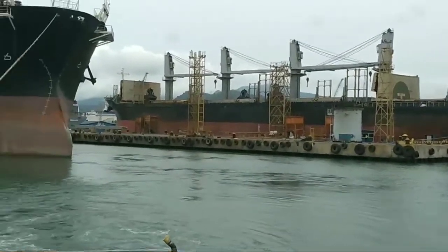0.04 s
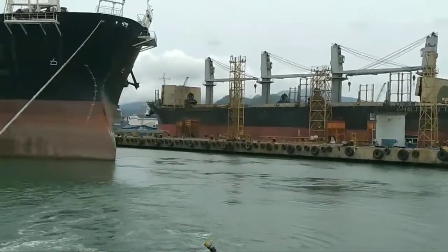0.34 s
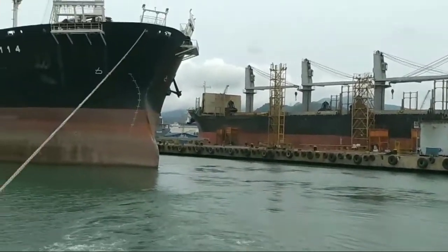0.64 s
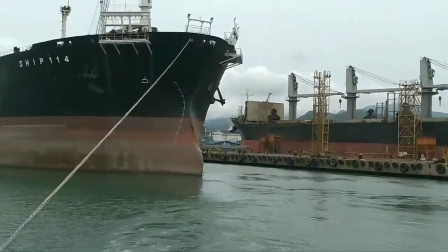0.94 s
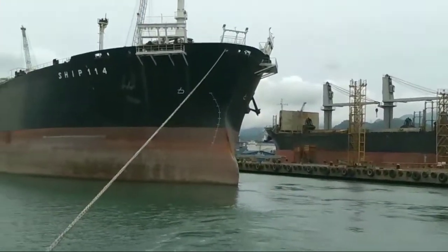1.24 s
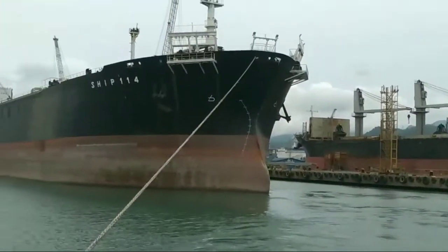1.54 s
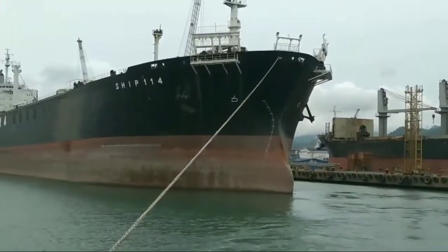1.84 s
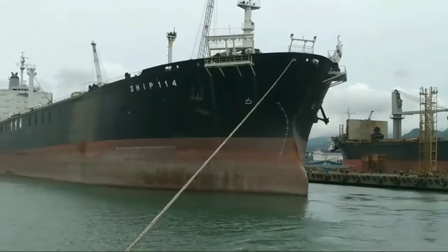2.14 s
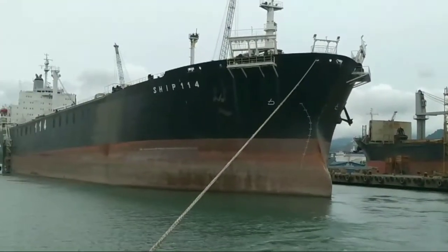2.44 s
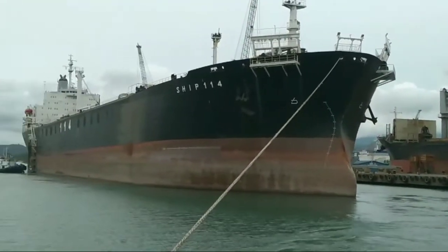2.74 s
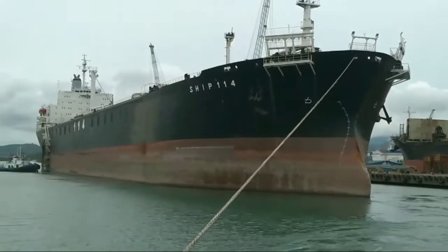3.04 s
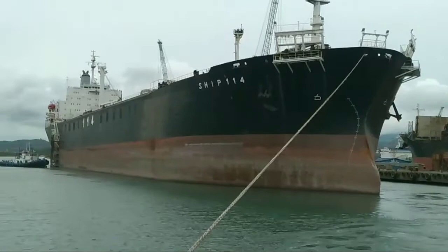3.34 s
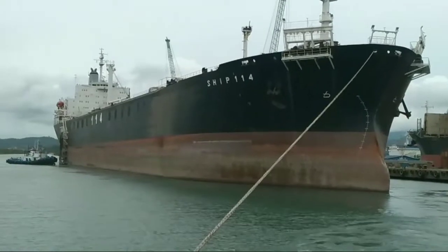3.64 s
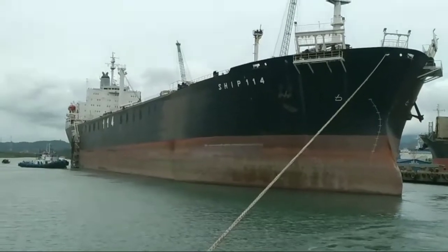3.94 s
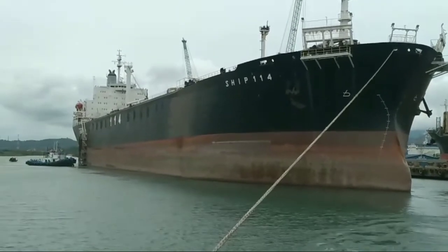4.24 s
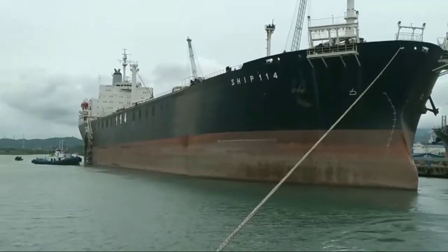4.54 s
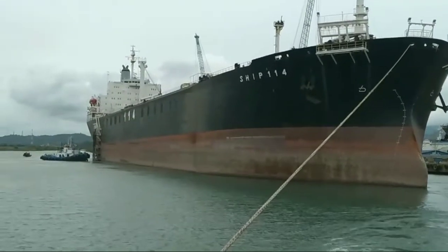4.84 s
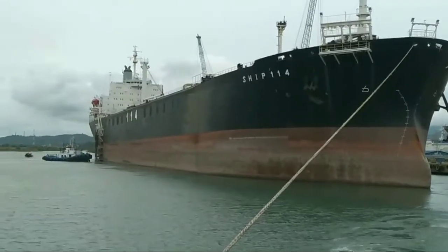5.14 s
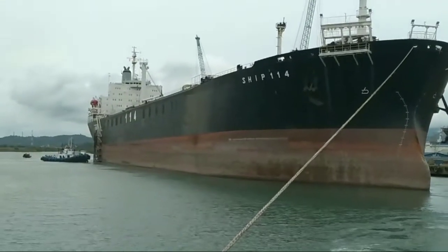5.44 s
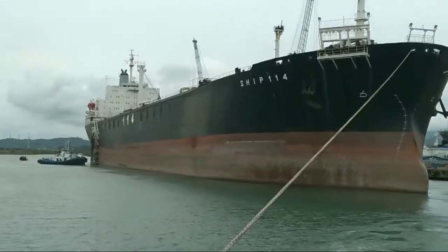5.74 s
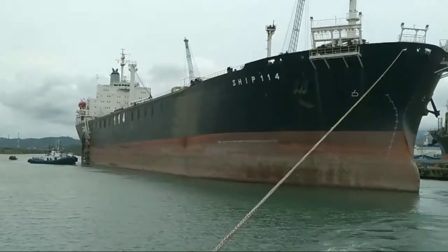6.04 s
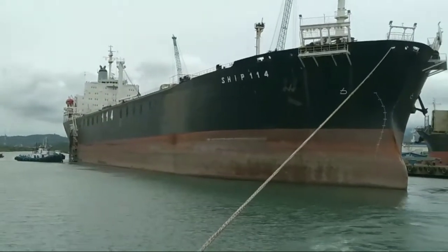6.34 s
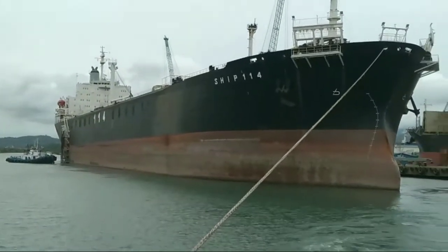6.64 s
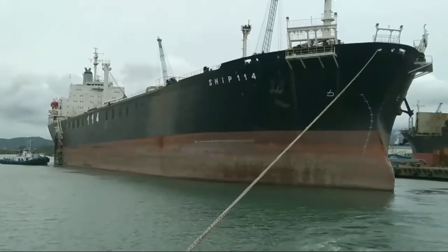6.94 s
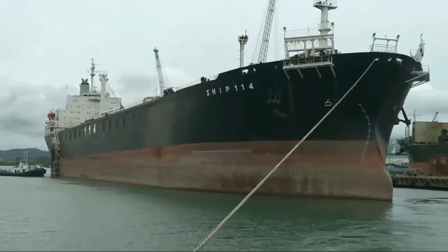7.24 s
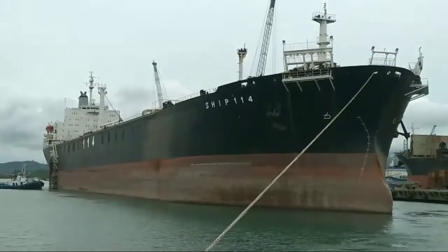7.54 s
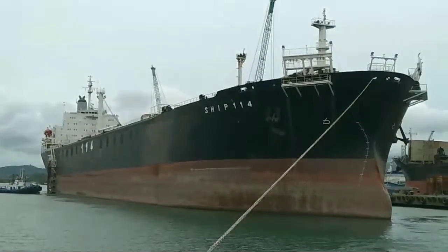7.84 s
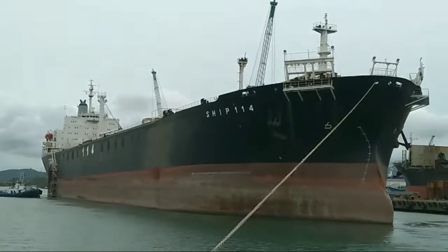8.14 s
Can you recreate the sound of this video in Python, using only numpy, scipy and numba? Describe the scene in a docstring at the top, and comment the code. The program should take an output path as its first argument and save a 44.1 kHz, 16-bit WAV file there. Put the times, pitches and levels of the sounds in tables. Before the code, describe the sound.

A tugboat's diesel engines throb steadily under a thin whine and hissing wake, while gusts of wind buffet the microphone.

```python
"""On the deck of a tugboat towing a ship. From the start, two slow diesels throb against each other,
a faster generator clatters, a turbocharger whines and the churned wake hisses; all of them run on.
At once, wind begins to buffet the microphone, mostly its right port (sound opening). Soon it rustles
some cloth, then comes a light tick; both return now and then. Gusts hit the right side hard from about
one to two seconds in, and one hits the left just after four. Scattered buffets go on to the end."""
import sys
import numpy as np
from scipy import signal
from scipy.fft import rfft, irfft, next_fast_len
from scipy.io import wavfile
from scipy.ndimage import uniform_filter1d
from numba import njit

SR = 44100
rng = np.random.default_rng(int(sys.argv[2]) if len(sys.argv) > 2 else 0)


def pcm_store(signal):
    """Save signal as 16-bit PCM."""
    levels = np.round(np.clip(np.atleast_2d(signal), -1, 1) * 32767)
    wavfile.write(sys.argv[1], SR, levels.astype(np.int16).T)


N = 369999
TIME = np.arange(N) / SR

# Exhaust tones of each engine: multiple_of_cycle_rate, level_db
FIRST_DIESEL_TONES = [(8, -24), (9, -30), (11, -26), (12, -39), (13, -32), (14, -43), (15, -30), (20, -45),
                      (21, -42), (22, -41), (23, -33), (24, -37), (25, -38), (26, -44)]
SECOND_DIESEL_TONES = [(8, -26), (9, -28.5), (10, -66), (13, -33), (16, -40)]
GENERATOR_TONES = [(6, -41), (9, -36), (12, -36), (18, -44.5), (21, -46), (27, -47), (30, -47), (32, -49),
                   (33, -49), (44, -53), (57, -55), (66, -58), (72, -59), (89, -58.5), (101, -61),
                   (113, -61)]
# How strong each noise is from low to high pitch: pitch_hz, level_db_per_hz
DIESEL_KNOCK_SPECTRUM = [(100, -78), (170, -54), (260, -55.5), (380, -59), (500, -66), (800, -70.5),
                         (1400, -79), (2200, -82), (5000, -105)]
GENERATOR_KNOCK_SPECTRUM = [(130, -93), (240, -64), (380, -59), (520, -63.5), (900, -68.5), (1150, -67.5),
                            (1400, -66), (1800, -84.5), (2400, -84.5), (3300, -94.5), (7000, -105)]
WAKE_SPECTRUM = [(60, -52), (300, -70.5), (800, -67.5), (2000, -78), (3200, -90), (6000, -84.5),
                 (15000, -87)]
WIND_RUMBLE_SPECTRUM = [(3, -70), (10, -45), (32, -39.5), (60, -44.5), (120, -48), (200, -51), (400, -88),
                        (1000, -110)]
# The generator's loudness as the microphone moves about: time_s, gain_db
GENERATOR_LOUDNESS = [(0, -2), (1.5, -0.5), (5.5, -1), (7, -1.8), (8.39, -2.8)]
# The course of the turbocharger's whine: time_s, pitch_hz, level_db
WHINE_COURSE = [(0, 2680, -51), (0.18, 2696, -47), (0.52, 2688, -45), (0.68, 2692, -52),
                (0.97, 2700, -48.5), (1.5, 2712, -49), (2.6, 2735, -49), (3.1, 2730, -46.5),
                (3.7, 2744, -48), (8.39, 2746, -49.5)]
# The whine's narrow core and the broad air noise around it: width_hz, gain_db
WHINE_NOISE_BANDS = [(130, -5.5), (620, -5)]
# Gusts on top of the breeze: full_strength_s, hold_s, rise_db, port (0 left, 1 right)
WIND_GUSTS = [(0.915, 0.19, 7, 1), (1.414, 0.68, 7.5, 1), (3.418, 0.57, 3.5, 1), (4.253, 0.12, 10.5, 0),
              (4.85, 0.49, 3, 1)]
# The hardest eddies (swirls of air) to hit a port: peak_s, sputter_db, length_s, core_s, thud_db, port
HARD_EDDIES = [(0.089, -19.5, 0.012, 0.00059, -16, 0), (0.13, -14.5, 0.0067, 0.00072, -19, 1),
               (0.321, -14, 0.006, 0.00068, -19, 1), (0.375, -10.5, 0.0076, 0.00095, -13, 1),
               (0.646, -15.5, 0.004, 0.00057, -20, 1), (0.662, -15, 0.0088, 0.00042, -15, 0),
               (0.681, -10, 0.0095, 0.001, -28, 1), (0.759, -15.5, 0.012, 0.00079, -11, 1),
               (0.853, -15.5, 0.0086, 0.00082, -11, 1), (0.938, -9.5, 0.0053, 0.00053, -17, 1),
               (0.945, -11.5, 0.0036, 0.00049, -18, 1), (0.954, -9, 0.0044, 0.00057, -17, 1),
               (0.977, -6.5, 0.008, 0.00062, -30, 1), (1.07, -12.5, 0.0058, 0.00054, -29, 1),
               (1.139, -15, 0.014, 0.00067, -15.5, 1), (1.175, -4, 0.0065, 0.0012, -8, 1),
               (1.246, -19, 0.0098, 0.00047, -8.5, 1), (1.393, -13.5, 0.019, 0.00071, -13, 1),
               (1.421, -7.5, 0.0036, 0.0004, -25, 1), (1.433, -10, 0.0081, 0.00064, -15, 1),
               (1.457, -11.5, 0.009, 0.00079, -24, 1), (1.477, -13, 0.0074, 0.0007, -12, 1),
               (1.551, -17, 0.015, 0.00073, -18, 1), (1.589, -13.5, 0.017, 0.00085, -13, 1),
               (1.611, -12.5, 0.0095, 0.00062, -22, 1), (1.657, -14, 0.008, 0.00055, -21, 1),
               (1.764, -11.5, 0.0098, 0.00076, -13, 1), (1.796, -13, 0.016, 0.00091, -17, 1),
               (1.818, -9, 0.011, 0.00081, -13, 1), (1.851, -12.5, 0.0087, 0.00055, -7, 1),
               (1.98, -11, 0.005, 0.0008, -14, 1), (2.008, -13.5, 0.0074, 0.0011, -14, 1),
               (2.031, -11, 0.016, 0.00096, -11, 1), (2.085, -14.5, 0.017, 0.00068, -11, 1),
               (2.123, -11, 0.005, 0.0011, -16, 1), (2.141, -13, 0.0051, 0.00061, -14, 1),
               (2.154, -14, 0.005, 0.00056, -27, 1), (2.313, -14, 0.007, 0.00082, -8.5, 1),
               (2.444, -11, 0.0026, 0.00091, -18, 1), (2.622, -14.5, 0.0068, 0.00045, -9.5, 1),
               (2.962, -15, 0.0064, 0.0012, -9, 1), (3.047, -8, 0.0025, 0.00057, -25, 1),
               (3.121, -12, 0.0055, 0.00061, -23, 1), (3.13, -15, 0.0055, 0.00042, -13, 1),
               (3.242, -17, 0.012, 0.00088, -20, 1), (3.438, -17, 0.014, 0.00075, -17, 1),
               (3.605, -9.5, 0.007, 0.00083, -18, 1), (3.619, -13, 0.0087, 0.00071, -17, 1),
               (3.635, -17, 0.0065, 0.00076, -12, 1), (3.811, -12, 0.0059, 0.0016, -16, 1),
               (4.024, -15.5, 0.025, 0.0007, -20, 1), (4.075, -20, 0.0072, 0.00047, -28, 0),
               (4.247, -23, 0.032, 0.00045, -13, 0), (4.293, -18.5, 0.026, 0.00066, -14, 0),
               (4.37, -17, 0.0086, 0.00084, -14, 1), (4.512, -13.5, 0.0055, 0.00052, -27, 1),
               (4.908, -15, 0.0087, 0.0012, -14, 1), (5.02, -16.5, 0.015, 0.00078, -25, 1),
               (5.197, -20, 0.006, 0.00046, -22, 1), (5.337, -16, 0.01, 0.0009, -18, 1),
               (5.486, -15, 0.0055, 0.00078, -23, 1), (5.768, -9.5, 0.01, 0.00072, -7.5, 1),
               (5.887, -17, 0.0098, 0.00069, -7.5, 1), (6.169, -17.5, 0.01, 0.00053, -18, 1),
               (6.864, -12, 0.0089, 0.00072, -9, 1), (6.923, -8.5, 0.0051, 0.0006, -8, 1),
               (7.043, -21, 0.0076, 0.0011, -11, 0), (7.137, -13.5, 0.012, 0.00078, -25, 1),
               (7.317, -5.5, 0.0046, 0.00082, -13.5, 1), (7.875, -17.5, 0.0074, 0.00077, -20, 1),
               (8.094, -17.5, 0.028, 0.00085, -21, 1)]
# Cloth flapping in the wind: peak_s, level_db, length_s
CLOTH_RUSTLES = [(0.13, -46, 0.083), (0.635, -50.5, 0.19), (1.64, -48, 0.03), (1.96, -49, 0.025),
                 (2.277, -47, 0.036), (3.14, -44.5, 0.027), (3.636, -44, 0.021), (4.025, -45, 0.041),
                 (7.797, -47, 0.021), (8.048, -47, 0.046)]
# Light ticks near the microphone: start_s, level_db
TICK_TAPS = [(0.580, -43), (0.699, -43.5), (1.622, -44), (2.779, -40), (3.125, -43), (3.622, -36),
             (3.987, -36), (4.008, -36), (4.019, -43), (7.772, -44)]
# Filters that give each close sound its tone: pitch_hz, gain_db
TURBULENCE_FILTER = [(8, -30), (30, -13), (120, 4), (250, 3.5), (500, -4.5), (1000, -10), (3000, -28)]
THUD_FILTER = [(8, -34), (25, -15), (50, -3), (110, 0.5), (220, -8.5), (450, -18), (1500, -95)]
SPUTTER_FILTER = [(150, -1.5), (400, -1), (750, 1), (1100, -0.5), (1700, -6), (5000, 0)]
CLOTH_FILTER = [(1500, -25), (3000, 0), (3330, 0), (3500, 14.5), (3680, -3), (4000, 5), (4900, 6),
                (5700, 7), (7000, -1), (8400, -1), (10000, 2), (15000, -19)]
TICK_FILTER = [(2000, -25), (3100, -8), (3500, 7), (3900, -7), (5200, 0), (7000, -6), (8400, 8), (9800, 4),
               (11000, -6), (15000, -22)]
# The hollow behind each port rings in its own way: pitch_hz, left_gain_db, right_gain_db
PORT_RESONANCES = [(1730, -0.5, -0.5), (2760, 4, 1), (3900, 6.5, 4.5), (4940, 1, -2), (6460, 2.5, -4),
                   (7380, 9, -3), (8680, 3, -0.5), (9940, -6.5, 3.5), (10950, -3.5, 5), (12400, -29, -1.5),
                   (15000, -13, -7)]

BREEZE_DB = [-34.5, -28.5]  # steady wind at the sheltered left port and the exposed right port


def amp(db):
    """Turn decibels into a number to multiply by."""
    return 10 ** (np.asarray(db) / 20)


def curves(table):
    """Join the rows of a table with straight lines in time, one curve per column."""
    times, *columns = np.transpose(table)
    return [np.interp(TIME, times, column) for column in columns]


def unit(x):
    """Scale a signal to an average strength (rms) of 1."""
    return x / np.sqrt(np.mean(x ** 2) + 1e-18)


def colour(x, spectrum):
    """Turn pitches up or down along a curve of (pitch_hz, gain_db) points."""
    hz, db = np.transpose(spectrum)
    size = next_fast_len(N)
    bin_hz = np.maximum(np.arange(size // 2 + 1) * SR / size, 1)
    gain = amp(np.interp(np.log(bin_hz), np.log(hz), db))
    return irfft(rfft(x, size) * gain, size)[..., :N]


def shape_noise(x, spectrum):
    """Give white noise a spectrum in dB per Hz."""
    return colour(unit(x), spectrum) * np.sqrt(SR / 2)


def wander(rate_hz):
    """A smooth random curve with about rate_hz new values a second and a spread of 1."""
    step = max(int(SR / rate_hz), 2)
    held = np.repeat(rng.standard_normal(N // step + 2), step)
    return unit(uniform_filter1d(uniform_filter1d(held, step), step)[:N])


def from_right(x, lag_s):
    """A sound from the right reaches the left port a little later."""
    return np.array([np.interp(TIME - lag_s, TIME, x), x])


def on_deck(paths, direct_share, lag_s):
    """Of three versions of a sound, one comes straight; two bounce off steelwork, to one port each."""
    return np.sqrt(direct_share) * from_right(paths[0], lag_s) + np.sqrt(1 - direct_share) * paths[1:]


def swell(noise, peak_s, db, length_s):
    """Fade a piece of noise in and out in a bell shape, with level db at the top."""
    out, length_s = np.zeros(N), max(length_s, 0.002)
    a, b = np.clip([int((peak_s - 2 * length_s) * SR), int((peak_s + 2 * length_s) * SR)], 0, N)
    bell = np.exp(-2 * ((TIME[a:b] - peak_s) / length_s) ** 2)
    out[a:b] = amp(db) * unit(noise[a:b] * bell) * np.sqrt(np.mean(bell ** 2))
    return out


def crankshaft(cycle_hz, drift_s, shake_s):
    """Count engine cycles (two turns each): the speed control drifts, uneven firings shake the shaft."""
    return cycle_hz * (TIME + drift_s * wander(1.2) + shake_s * wander(70))


def exhaust(cycles, tones, gain_db, waver_db):
    """Unequal cylinders give tones at multiples of the cycle rate; moving air makes each waver."""
    hum = np.zeros(N)
    for multiple, level_db in tones:
        loudness = amp(level_db + waver_db * wander(2.067))
        hum += loudness * np.sin(2 * np.pi * (multiple * cycles + rng.random()))
    return from_right(np.sqrt(2) * amp(gain_db) * hum, lag_s=0.0003)


def knocks(cycles, spectrum, count, ring_gaps, uneven_db, gas_noise, direct_share, lag_s):
    """Each cycle repeats the same count knocks, each with its own ring, plus fresh gas noise."""
    cycle_samples = int(N / (cycles[-1] - cycles[0]))
    place = cycles % 1
    ringing = rng.standard_normal((3, SR))[:, (place * cycle_samples).astype(int)]
    strength = amp(uneven_db * rng.standard_normal(count))[(place * count).astype(int) % count]
    decay = np.exp(-(place * count % 1) / ring_gaps)  # time is counted in gaps between knocks
    paths = strength * decay * (ringing + gas_noise * rng.standard_normal((3, N)))
    return shape_noise(on_deck(paths, direct_share, lag_s), spectrum)


def main_diesels():
    """Two eight-cylinder diesels: their close tones beat into a slow throb, and the slower one knocks."""
    first = crankshaft(cycle_hz=5.512, drift_s=0.0003, shake_s=0.00008)
    second = crankshaft(cycle_hz=6.502, drift_s=0.00042, shake_s=0.00008)
    throb = exhaust(first, FIRST_DIESEL_TONES, gain_db=0.5, waver_db=0.47)
    throb += exhaust(second, SECOND_DIESEL_TONES, gain_db=0.5, waver_db=0.6)
    return throb + knocks(first, DIESEL_KNOCK_SPECTRUM, count=8, ring_gaps=2, uneven_db=2.5,
                          gas_noise=0.66, direct_share=0.87, lag_s=0.0001)


def generator():
    """A six-cylinder engine: firings and closing valves take turns, making twelve knocks a cycle."""
    cycles = crankshaft(cycle_hz=12.29, drift_s=0.00025, shake_s=0.00007)
    hum = exhaust(cycles, GENERATOR_TONES, gain_db=2.5, waver_db=2.5)
    clatter = knocks(cycles, GENERATOR_KNOCK_SPECTRUM, count=12, ring_gaps=0.96, uneven_db=0,
                     gas_noise=0.38, direct_share=0.55, lag_s=0.00026)
    return amp(curves(GENERATOR_LOUDNESS)[0]) * (hum + clatter)


def turbocharger(flutter_db=1.2, wander_hz=22, turn_s=2.5):
    """A breathy whine: air noise around the tone of the blades, wandering and fluttering with the wind."""
    pitch_hz, level_db = curves(WHINE_COURSE)
    phase = 2 * np.pi * np.cumsum(pitch_hz + wander_hz * wander(12)) / SR
    paths = np.zeros((3, N))
    for path in paths:
        for width_hz, gain_db in WHINE_NOISE_BANDS:
            path += amp(gain_db) * (wander(width_hz) * np.cos(phase) + wander(width_hz) * np.sin(phase))
    # the microphone swings round once, so the whine reaches the left port less late
    lag_s = np.interp(TIME, [0, turn_s], [0.00041, 0.000183])
    return amp(level_db + flutter_db * wander(16)) * on_deck(paths, direct_share=0.7, lag_s=lag_s)


def wake(swell_db=0.48, fizz_db=0.5):
    """Churned water hisses evenly all around."""
    foam = rng.standard_normal((2, N)) * amp(swell_db * wander(6) + fizz_db * wander(300))
    return shape_noise(foam, WAKE_SPECTRUM)


def wind_strength(build_s=0.32, fade_s=0.16):
    """The wind at each port in dB: a steady breeze plus gusts that build, hold and die away."""
    wind_db = np.outer(BREEZE_DB, np.ones(N))
    for full_s, hold_s, rise_db, port in WIND_GUSTS:
        corners_s = [full_s - build_s, full_s, full_s + hold_s, full_s + hold_s + fade_s]
        wind_db[port] += rise_db * np.interp(TIME, corners_s, [0, 1, 1, 0])
    return wind_db


@njit
def lowpass(x, cutoff_hz):
    """Soften everything above a moving cutoff pitch (a state-variable filter)."""
    out, band_state, low_state = np.empty(len(x)), 0., 0.
    for i in range(len(x)):
        step = np.tan(np.pi * cutoff_hz[i] / SR)
        band = (band_state + step * (x[i] - low_state)) / (1 + step * (step + 1.4))
        out[i] = low_state + step * band
        band_state, low_state = 2 * band - band_state, 2 * out[i] - low_state
    return out


def turbulence(level_db, flutter_db, brighten=0.34):
    """Air tumbles over one port: faster air is louder and sheds smaller, brighter eddies."""
    gust_db = level_db + flutter_db * np.tanh((wander(22) + wander(90)) / 2)
    cutoff_hz = np.clip(480 * amp(brighten * (gust_db + 20)), 60, 900)
    air = unit(colour(rng.standard_normal(N), TURBULENCE_FILTER))
    return amp(gust_db) * lowpass(air, cutoff_hz)


def wind(wind_db, shelter_db=-5, rumble_follow=0.56, surge_db=2, unrest_db=2):
    """A surging low rumble and tumbling air at each port; the left one is sheltered."""
    left_db, right_db = wind_db[0], wind_db[1] + unrest_db * wander(6)
    left_rumble_db = shelter_db + surge_db * wander(16)
    right_rumble_db = rumble_follow * (right_db - right_db.mean()) + surge_db * wander(12)
    rumble = shape_noise(rng.standard_normal((2, N)), WIND_RUMBLE_SPECTRUM)
    tumbling = np.array([turbulence(left_db, flutter_db=9), turbulence(right_db, flutter_db=5.5)])
    return amp([left_rumble_db, right_rumble_db]) * rumble + tumbling


def stray_eddies(wind_db, port, per_second=5, over_breeze_db=3.5, gust_follow=0.86, core_s=0.00069):
    """Lesser eddies come by chance and grow in gusts; they are listed like HARD_EDDIES."""
    gap, strength, size = rng.random((100, 3)).T
    times_s = np.cumsum(2 * gap) / per_second
    gust_db = np.interp(times_s, TIME, wind_db[port]) - BREEZE_DB[port]
    chance_db = 2 * strength - 1
    levels_db = BREEZE_DB[port] + over_breeze_db + gust_follow * gust_db + chance_db
    lengths_s = 0.0093 * (0.5 + size)
    return [(peak_s, db, length_s, core_s, db, port)
            for peak_s, db, length_s in zip(times_s, levels_db, lengths_s) if peak_s < TIME[-1]]


def vortices(peak_s, db, length_s, core_s, gap_s=0.0025, core_spread=0.078, spread_db=2.5, count=13):
    """Tiny whirls sweep past a port; each pushes and sucks, and a tighter core cracks more sharply."""
    shift, core, size, spin = rng.standard_normal((count, 4)).T
    offsets_s = gap_s * (np.arange(count) - count // 2 + np.tanh(shift) / 2)
    bell = np.exp(-2 * (offsets_s / max(length_s, gap_s)) ** 2)
    strength = np.sign(spin) * amp(spread_db * size) * bell
    cores_s = core_s * np.exp(core_spread * np.tanh(core))
    a, b = np.clip([int((peak_s - 0.04) * SR), int((peak_s + 0.04) * SR)], 0, N)
    distance = (TIME[a:b, None] - peak_s - offsets_s) / cores_s  # from the port, in core sizes
    pressure = (distance / (1 + distance ** 2) ** 2) @ strength
    out = np.zeros(N)
    out[a:b] = amp(db) * unit(pressure) * np.sqrt(length_s * SR / (b - a))
    return out


def buffets(wind_db, thud_gain_db=-1.5, thud_s=0.022, leak=0.018):
    """Single eddies hit a port: a sputter of tiny whirls on top of a longer, low thud of pressure."""
    pressure = colour(rng.standard_normal((2, N)), THUD_FILTER)
    sputter, thuds = np.zeros((2, N)), np.zeros((2, N))
    eddies = list(HARD_EDDIES) + stray_eddies(wind_db, port=0) + stray_eddies(wind_db, port=1)
    for peak_s, sputter_db, length_s, core_s, thud_db, port in eddies:
        sputter[port] += vortices(peak_s, sputter_db, length_s, core_s)
        thuds[port] += swell(pressure[port], peak_s, thud_db + thud_gain_db, thud_s)
    hits = colour(sputter, SPUTTER_FILTER) + thuds  # the port rounds off the sharpest cracks
    return hits + leak * hits[::-1]  # the other port feels a little of each hit


def cloth(gain_db=1.5, grain_db=1.5):
    """Wind flaps cloth near the microphone in short, grainy rustles."""
    fibres = colour(rng.standard_normal((2, N)) * amp(grain_db * wander(250)), CLOTH_FILTER)
    out = np.zeros((2, N))
    for peak_s, level_db, length_s in CLOTH_RUSTLES:
        out += [swell(side, peak_s, level_db + gain_db, length_s) for side in fibres]
    return out


def ticks(decay_s=0.01):
    """Something small and hard near the microphone is tapped: a sharp start and a brief, gritty ring."""
    ring = colour(rng.standard_normal((2, N)), TICK_FILTER)
    taps = sum(amp(level_db) * (TIME >= start_s) * np.exp(-np.abs(TIME - start_s) / decay_s)
               for start_s, level_db in TICK_TAPS)
    return taps * unit(ring)


def scene():
    """Add up the machinery, water, wind, cloth and ticks."""
    wind_db = wind_strength()
    machinery = main_diesels() + generator() + turbocharger()
    return machinery + wake() + wind(wind_db) + buffets(wind_db) + cloth() + ticks()


def record(dry, top_hz=15100):
    """The ports colour the treble, the hardest buffets are rounded off, and the highest pitches are cut."""
    ports = np.array(PORT_RESONANCES)
    heard = np.array([colour(dry[0], ports[:, [0, 1]]), colour(dry[1], ports[:, [0, 2]])])
    rounded = heard / (1 + heard ** 8) ** (1 / 8)
    treble_cut = signal.ellip(10, 0.1, 80, top_hz, fs=SR, output="sos")
    return signal.sosfilt(treble_cut, rounded)


dry = scene()
out = record(dry)
pcm_store(out)
```